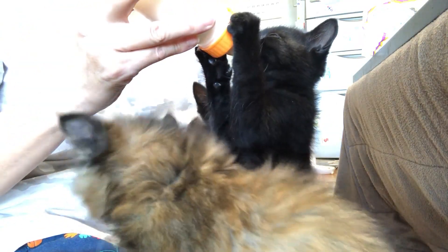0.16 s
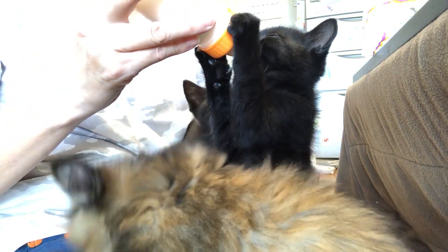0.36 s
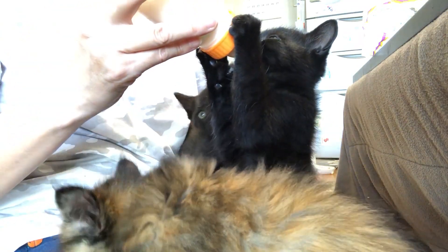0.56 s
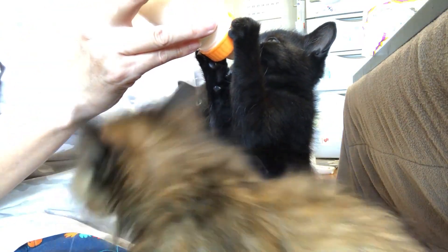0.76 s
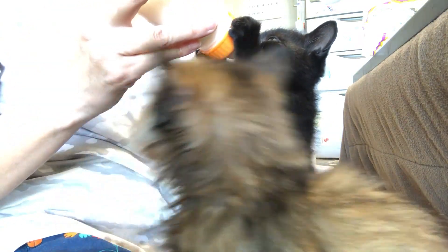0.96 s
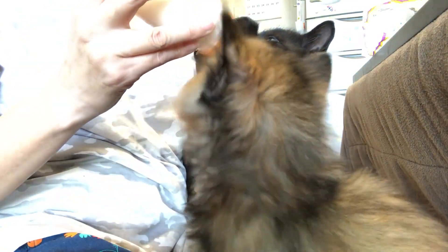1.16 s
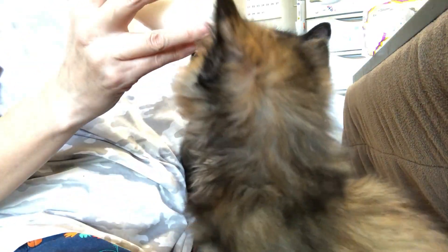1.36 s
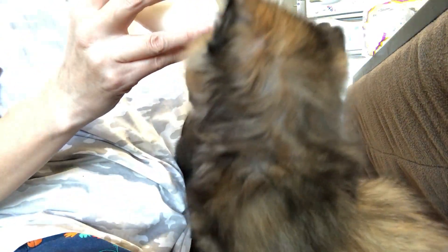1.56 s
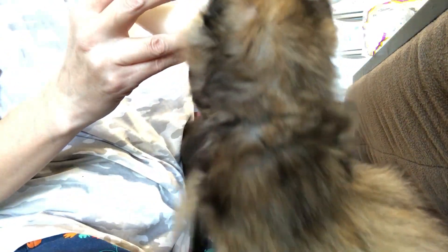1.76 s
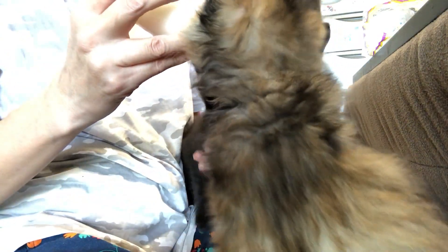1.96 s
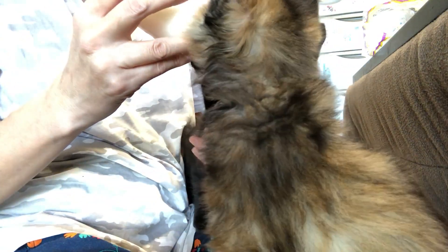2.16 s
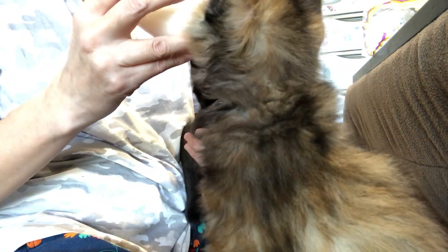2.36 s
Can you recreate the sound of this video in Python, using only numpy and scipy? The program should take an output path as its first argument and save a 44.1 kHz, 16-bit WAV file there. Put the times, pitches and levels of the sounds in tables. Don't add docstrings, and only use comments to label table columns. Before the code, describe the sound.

Single thin kitten mew in a quiet room, with suckling clicks, milk bubbles and fur rustling

```python
import sys
import numpy as np
from scipy import signal
from scipy.fft import rfft, irfft
from scipy.io import wavfile
from scipy.ndimage import uniform_filter1d

SR = 44100
rng = np.random.default_rng(int(sys.argv[2]) if len(sys.argv) > 2 else 0)


def linear_from_db(decibels):
    return 10 ** (np.asarray(decibels, float) / 20)


def materialize(psi):
    bounded = np.clip(np.atleast_2d(psi).T, -1, 1)
    quanta = np.round(bounded * 32767).astype(np.int16)
    wavfile.write(sys.argv[1], SR, quanta)


N = 110250
T = np.arange(N) / SR
BANDS_HZ = 28 * 2 ** np.arange(0, 9.3, 1 / 3)


def curve(table, x, log=False):
    a, b = np.array(table, float).T
    if log:
        return np.interp(np.log(x), np.log(a), b)
    return np.interp(x, a, b)


def walk(rate_hz):
    k = max(int(SR / rate_hz), 1)
    steps = np.repeat(rng.standard_normal(N // k + 1), k)
    smooth = uniform_filter1d(uniform_filter1d(steps, k), k)[:N]
    return smooth / smooth.std()


def band(hz, width_hz):
    f = np.arange(N // 2 + 1) * SR / N
    spectrum = rfft(rng.standard_normal(N)) * np.exp(-((f - hz) / width_hz) ** 2)
    return irfft(spectrum, N) / np.sqrt(SR)


def mew():
    # time_s, pitch_hz
    mew_pitch = [(1.33, 1200), (1.366, 1150), (1.44, 1104), (1.468, 1124), (1.548, 1103), (1.595, 1126),
                 (1.745, 1128), (1.79, 1102), (1.854, 1134)]
    # time_s, effort_db
    mew_effort = [(1.325, -60.5), (1.455, -63.5), (1.495, -56), (1.57, -61), (1.598, -51), (1.762, -48),
                  (1.805, -55.5), (1.856, -48.5), (1.878, -61.5)]
    # time_s, pitch_flick_hz, level_change_db, length_s
    mew_flicks = [
        (1.466, 15, -6, .003),
        (1.51, 0, -5, .005),
        (1.547, 0, -8, .004),
        (1.561, 0, -8, .003),
        (1.721, 24, 1, .008),
        (1.766, 14, 1, .006),
        (1.809, 0, -5, .004),
        (1.326, 0, 2.5, .004),
        (1.852, 0, 1.5, .008),
    ]
    # time_s, opening (0 shut, 1 open)
    mew_mouth = [
        (1.321, .2),
        (1.324, 1.0),
        (1.454, 1.0),
        (1.464, .64),
        (1.51, .16),
        (1.76, .0),
        (1.81, .35),
        (1.852, .0),
        (1.876, .5),
    ]
    # frequency_hz, level_db
    open_colour = [(1100, -2), (2300, 15.5), (3500, 5), (4600, -6.5), (5700, -11), (7000, -17),
                   (15000, -28)]
    # frequency_hz, level_db
    shut_colour = [(1100, 1), (2250, -19), (3400, -35.5), (4500, -46), (7000, -55), (15000, -61)]
    start_s, attack_s, end_s, release_s = 1.314, .0031, 1.875, .004
    age = T - start_s
    since_start = np.abs(age)

    jitter = .0027
    hz = curve(mew_pitch, T) * (1 + jitter * walk(160) + jitter * walk(25.1))
    hz = hz + 230 * np.exp(-since_start / .006)
    hz = hz - 7500 * np.clip(T - 1.861, 0, .03)
    effort_db = curve(mew_effort, T) + 0.97
    for s, flick_hz, change_db, length_s in mew_flicks:
        bump = np.exp(-((T - s) / length_s) ** 2)
        hz = hz + flick_hz * bump
        effort_db = effort_db + change_db * bump
    phase = 2 * np.pi * np.cumsum(hz) / SR
    mouth = np.clip(curve(mew_mouth, T), 0, 1.2)

    dulling_db_s, shimmer_db, patchy_db = 38, .5, .8
    air_db, rasp_db, rasp_s = -23, 9, .0072
    ring_lag_s = .008
    ring_hz = 11800 - 4800 * np.exp(-since_start / .063)
    ring_level = np.clip((age - ring_lag_s) / ring_lag_s, 0, 1) * linear_from_db(-70.5 - 65 * age)
    voice = 0
    for k in range(1, 14):
        f = k * hz
        above_second = max(k - 2, 0) ** .5
        open_db = curve(open_colour, f, True) - dulling_db_s * above_second * age
        shut_db = curve(shut_colour, f, True)
        throat = linear_from_db(effort_db + mouth * open_db + (1 - mouth) * shut_db)
        ring = ring_level * np.exp(-((f - ring_hz) / 1600) ** 2)
        rough = 1 + k * linear_from_db(air_db + rasp_db * np.exp(-since_start / rasp_s)) * walk(700)
        flicker = linear_from_db(shimmer_db * np.sqrt(k) * walk(60) + patchy_db * above_second * walk(25))
        tone = np.sin(k * phase + k * k) * (f < 15700)
        voice = voice + (throat + ring) * flicker * rough * tone

    breath = band(1390, 570)
    breath = linear_from_db(-74.5 + 3.7 * walk(38.9)) * breath / breath.std()
    hiss = band(4900, 4000)
    hiss = linear_from_db(-69.5 - 46 * since_start + 2.3 * walk(150)) * np.sqrt(mouth) * hiss / hiss.std()
    gate = np.clip(age / attack_s, 0, 1) * np.exp(-np.clip(T - end_s, 0, 1) / release_s)
    return gate * (np.sqrt(2) * voice + hiss + breath)


def blips(table, glide, spit_db):
    out = np.zeros(N)
    for s, db, hz, length_s in table:
        u = (T - s) / length_s
        swell = np.cos(np.pi * np.clip(u, -.5, .5)) ** 2
        tone = swell * np.sin(2 * np.pi * hz * (T - s) * (1 + glide * u))
        spit = band(hz, 0.5 * hz)
        spit = spit / spit.std() * np.exp(-np.clip(u + 0.34, 0, 40) / 0.51) * (u > -.4)
        out += linear_from_db(db) * (tone + .4 * linear_from_db(spit_db) * spit)
    return out


def smacks():
    # start_s, level_db, pitch_hz, length_s
    click_events = [(.072, -48.5, 1190, 0.0043), (.284, -57, 5000, 0.0018), (.153, -58, 2950, 0.014),
                    (.197, -47, 4840, 0.0045), (.21, -38.5, 3370, 0.00069), (.266, -52.5, 3500, 0.0022),
                    (.274, -47, 3880, 0.0019), (.338, -56, 3730, 0.0076), (.395, -53.5, 4530, 0.011),
                    (.396, -48.5, 1600, 0.0027), (.791, -53, 11100, 0.00027), (.792, -48, 4000, 0.0011),
                    (.075, -58, 3000, .005), (.197, -55, 3000, .003), (.345, -54, 2300, .008),
                    (1.117, -54.5, 5070, 0.0019), (1.188, -46, 3060, 0.0065), (1.196, -52, 2560, 0.0049),
                    (1.204, -58, 3000, 0.0017), (1.248, -45.5, 6440, 0.0012), (1.258, -44, 2540, 0.0011),
                    (1.263, -43.5, 4500, 0.00069), (1.278, -64, 11600, 0.0039), (1.572, -56, 2340, 0.0088),
                    (1.601, -53.5, 4170, 0.0033), (1.826, -56, 4200, 0.0019), (1.878, -48.5, 1490, 0.004),
                    (1.881, -49, 800, 0.0069), (1.952, -66, 4200, .003), (2.132, -59, 3000, 0.0029),
                    (2.245, -59.5, 2200, 0.0044), (2.308, -62, 2980, 0.0087), (2.33, -62.5, 4460, 0.0049),
                    (2.447, -63.5, 4490, 0.0016), (.274, -57, 6130, 0.0019), (.393, -51, 3100, .004),
                    (.138, -54, 2500, 0.0033), (.167, -55, 2720, 0.0055), (.508, -62, 12400, 0.018),
                    (.505, -58, 4780, .01), (.549, -39, 2000, 0.0029), (.558, -43, 5500, .0015),
                    (.624, -46, 6000, .001), (.687, -42, 3000, .002), (.745, -50, 3700, 0.0065),
                    (1.325, -58.5, 5400, 0.0096), (1.327, -62, 9900, .006), (1.582, -67, 14200, .003),
                    (1.587, -62, 13500, .002), (1.6, -63, 14000, .003), (1.6, -66, 10000, .002)]
    return blips(click_events, .01, 0)


def gurgles():
    # start_s, level_db, pitch_hz, length_s
    bubble_events = [
        (.289, -42.5, 994, .015),
        (.319, -44.5, 960, 0.0093),
        (.327, -43, 960, 0.0063),
        (.362, -42.5, 900, 0.01),
        (.408, -53.5, 1030, 0.0082),
        (1.893, -62, 1080, 0.023),
        (1, -56.5, 886, 0.018),
        (.905, -50.5, 900, 0.019),
    ]
    return blips(bubble_events, .04, -3.5)


def taps():
    # start_s, level_db, pitch_hz, length_s
    tap_events = [(.022, -57, 940, .004), (.116, -59, 890, 0.0059), (1.99, -59, 700, 0.0033),
                  (2.038, -54, 500, .003), (2.074, -60, 888, 0.0047), (2.133, -56.5, 620, .004),
                  (2.181, -59, 550, .003), (2.207, -58.5, 900, 0.0055), (2.312, -62, 930, 0.0086),
                  (2.43, -60.5, 990, .008), (2.45, -58, 450, 0.0035)]
    return blips(tap_events, 0, 1.7)


def thumps():
    # start_s, level_db, pitch_hz, length_s
    thump_events = [(.2, -49, 192, 0.044), (.357, -47.5, 188, 0.03), (.575, -41, 154.4, 0.056),
                    (.57, -39.5, 482, 0.023), (.6, -40, 202, 0.047), (.637, -39.5, 513, 0.031),
                    (.64, -42, 154.4, 0.13), (.67, -47, 72.4, 0.15), (.72, -41, 202, 0.079),
                    (.76, -51, 79, 0.18), (.81, -51, 187, 0.078), (.87, -49.5, 172, 0.053),
                    (.98, -50.5, 167, 0.063)]
    return blips(thump_events, -0.16, -1.7)


def scuffs():
    # start_s, level_db, fade_to_-60_db_s, brightness_db_per_octave
    scuff_events = [(0.067, -56.5, 0.42, 1), (0.135, -58.5, 1.2, 2.5), (.194, -55.5, 0.068, 6),
                    (.335, -55.5, 0.62, 1.5), (0.391, -68.5, 0.32, -14), (.484, -55, 1.4, 0.5),
                    (0.499, -64, 1.1, 8), (0.546, -39, 0.28, 3.5), (0.557, -41.5, 0.45, 2.5),
                    (.58, -41.5, 0.24, 1), (0.617, -43.5, 0.91, 2), (.622, -46, 0.26, 3.5),
                    (.745, -52.5, 0.31, 2.5), (.686, -49.5, 0.64, 1), (0.781, -52, 0.089, 4.5),
                    (0.82, -58.5, 1.17, -3), (1.056, -61.5, 0.4, 1.5), (1.188, -55, 0.14, 2),
                    (1.241, -66.5, 0.15, 9.5), (1.322, -62, 0.059, 6), (1.38, -63.5, 0.14, 6),
                    (1.569, -62, 0.29, 3.5), (1.877, -58, 0.14, 3), (2.128, -56.5, 0.043, -0.5),
                    (2.305, -61.5, 0.17, 2)]
    # frequency_hz, level_db_per_hz
    cloth_colour = [(60, -40), (200, 5.5), (500, 0), (900, -1), (2000, -8.5), (6300, -23), (10000, -36.5),
                    (15500, -37)]
    attack_s, treble_fade, grain_db, band_grain_db = .0028, .15, 1.24, 2.0
    grain = .5 * grain_db * walk(70.92) + grain_db * walk(500)
    coarse_t = T[::32]
    s, db, t60_s, tilt_db = np.array(scuff_events).T[:, :, None]
    age = np.clip(coarse_t - s, 0, None)
    attack = 1 - np.exp(-age / attack_s)
    out = 0
    for hz in BANDS_HZ:
        octave = np.log2(hz / 1000)
        band_t60_s = t60_s * 2 ** (-treble_fade * octave)
        fade = attack * linear_from_db(db + tilt_db * max(octave, -1) - 60 * age / band_t60_s)
        drag = np.interp(T, coarse_t, np.sqrt(np.sum(fade ** 2, axis=0)))
        texture = linear_from_db(curve(cloth_colour, hz, True) + 59 + grain + band_grain_db * walk(30.12))
        out = out + texture * drag * band(hz, hz / 6)
    return out


def room():
    # frequency_hz, level_db_per_hz
    room_colour = [(25, -19), (42, -9), (130, 5), (300, -11), (1100, -20), (2400, -27), (8000, -37.5),
                   (15500, -45)]
    swell = walk(0.47)
    out = 0
    for hz in BANDS_HZ:
        out = out + linear_from_db(curve(room_colour, hz, True) + .5 * swell + walk(11.63)) * band(hz, hz / 6)
    out = out + linear_from_db(-21 + 2.0 * walk(24.27)) * band(2150, 160)
    return out * linear_from_db(-57) / out.std()


def scene():
    near = mew() + smacks() + gurgles() + taps()
    echo_db, echo_t60_s = -21, .35
    tail = uniform_filter1d(rng.standard_normal(SR // 3), 4) * linear_from_db(-60 * T[:SR // 3] / echo_t60_s)
    echo = signal.fftconvolve(near, tail / np.sqrt(np.sum(tail ** 2)))[:N]
    return (near + linear_from_db(echo_db) * echo + thumps() + scuffs() + room())[None]


def band_limit(x):
    return signal.sosfilt(signal.butter(12, 15760, fs=SR, output="sos"), x)


def record(dry):
    rumble_cut = signal.butter(2, 30, "high", fs=SR, output="sos")
    treble_cut = signal.ellip(10, .2, 70, 15750, fs=SR, output="sos")
    mix = signal.sosfilt(treble_cut, signal.sosfilt(rumble_cut, dry))
    return band_limit(mix)


dry = scene()
out = record(dry)
materialize(out)
```